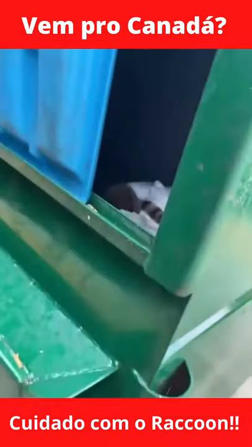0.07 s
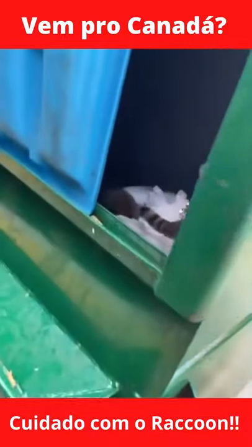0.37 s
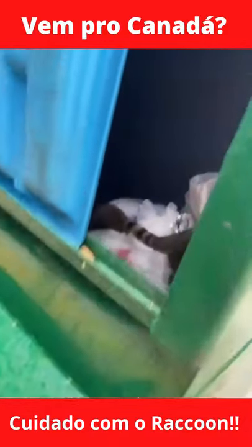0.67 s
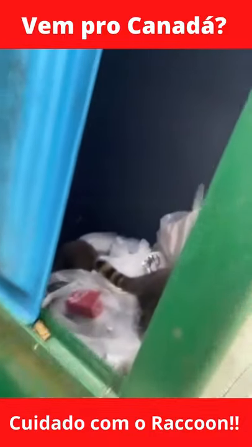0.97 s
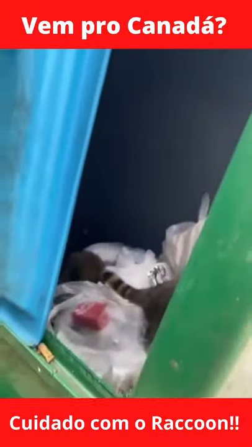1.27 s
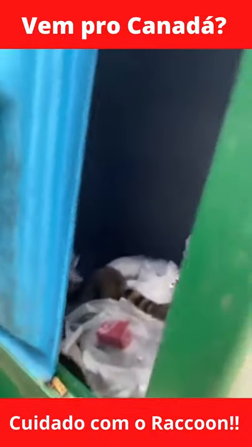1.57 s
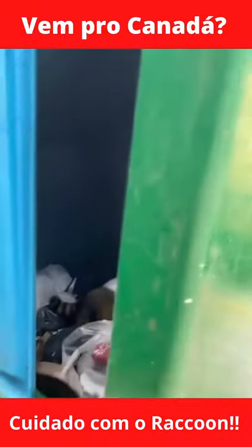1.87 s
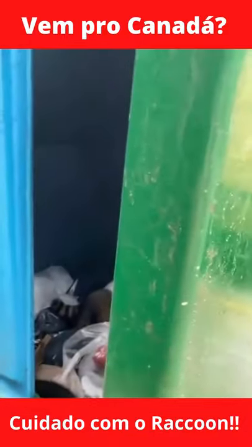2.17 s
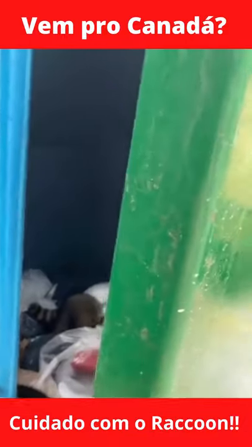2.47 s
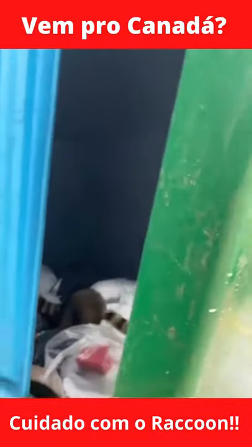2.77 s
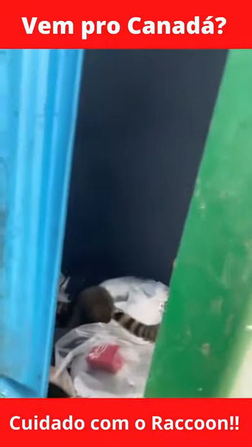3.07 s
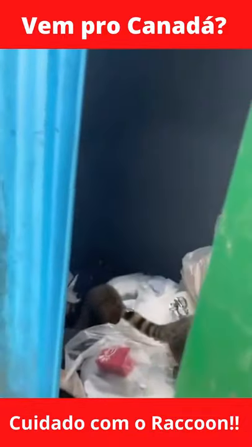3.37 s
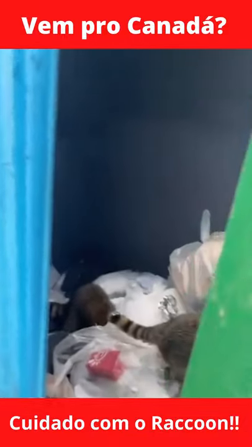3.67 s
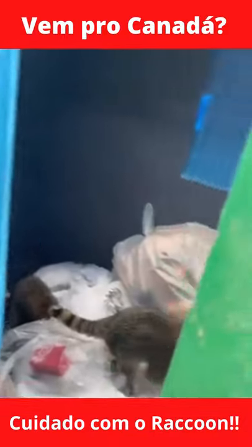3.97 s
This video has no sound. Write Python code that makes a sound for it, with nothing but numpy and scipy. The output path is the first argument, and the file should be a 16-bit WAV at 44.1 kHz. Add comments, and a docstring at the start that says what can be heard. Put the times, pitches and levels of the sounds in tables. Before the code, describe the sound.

Plastic bags rustle faintly and irregularly as an animal rummages in an outdoor bin, with light ticks and dull scrapes until about 1.7 seconds. Stiffer plastic snaps sharply at 2.1 seconds, followed by a few weaker snaps. The rustling picks up again from 3 seconds. Low wind buffets the microphone throughout, strongest around 1 second, over steady distant traffic.

```python
"""At a big outdoor rubbish bin, an animal rummages among plastic bags. Thin film swishes by friction and
crinkles by buckling, rubbish scrapes deeper down, and stiffer plastic snaps a few times; the snaps
and the larger creases reverberate briefly between the bin's walls. Turbulent gusts buffet the
microphone over the steady broadband wash of distant traffic."""
import sys
import numpy as np
from scipy import signal
from scipy.fft import rfft, irfft, next_fast_len
from scipy.io import wavfile
from scipy.ndimage import uniform_filter1d, map_coordinates

SR = 44100
rng = np.random.default_rng(int(sys.argv[2]) if len(sys.argv) > 2 else 0)


def file_out(sig):
    """Save sig as 16-bit WAV at sys.argv[1]."""
    # one column per channel
    cols = np.atleast_2d(sig).T
    # limit, then scale
    lim = np.clip(cols, -1, 1)
    pcm = np.round(lim * 32767).astype(np.int16)
    wavfile.write(sys.argv[1], SR, pcm)


N = 176400
TIME = np.arange(N) / SR


def amp(db):
    """Decibels to amplitude ratio."""
    return 10 ** (np.asarray(db) / 20)


def unit(x):
    """Normalisation to an rms of 1."""
    return x / np.sqrt(np.mean(x ** 2) + 1e-20)


def along(points, hz):
    """Interpolation of (Hz, value) points on a logarithmic frequency axis."""
    freqs, values = np.transpose(points)
    return np.interp(np.log(hz + 1), np.log(freqs + 1), values)


def wobble(knots_per_s):
    """Smooth random modulation: a spline through Gaussian knots."""
    return map_coordinates(rng.standard_normal(400), [TIME * knots_per_s], mode="wrap")


def coloured(x, gain_db):
    """Minimum-phase filtering of x by a gain in dB given as a function of frequency."""
    size = 2 * next_fast_len(len(x) // 2 + SR // 10)
    gain = amp(gain_db(np.fft.rfftfreq(size, 1 / SR)))
    cepstrum = irfft(np.log(gain + 1e-6), size)
    cepstrum[1:size // 2] *= 2  # folding the cepstrum makes the filter causal
    cepstrum[size // 2 + 1:] = 0
    return irfft(rfft(x, size) * np.exp(rfft(cepstrum)), size)[:len(x)]


def noise(spectrum):
    """White noise filtered to a spectrum, at an rms of 1."""
    return unit(coloured(rng.standard_normal(N), lambda hz: along(spectrum, hz)))


def evened(x, samples):
    """Division by the running rms removes chance swells."""
    power = uniform_filter1d(uniform_filter1d(x ** 2, samples), samples)
    return x / np.sqrt(np.abs(power) + 1e-9)


def bump(t, rise_s):
    """A critically damped pulse: it starts at t = 0, peaks at rise_s and dies away."""
    u = np.maximum(t, 0) / rise_s
    return u * np.exp(1 - u)


def swells(strokes):
    """The envelope of strokes that rise and fall exponentially and add in power."""
    return np.sqrt(sum((amp(db) * np.exp(-np.maximum((peak - TIME) / rise, (TIME - peak) / fall))) ** 2
                       for peak, db, rise, fall in strokes))


def resonance(hz, centre_hz, width_hz):
    """A Lorentzian resonance curve of height 1."""
    return 1 / (1 + (2 * (hz - centre_hz) / width_hz) ** 2)


# Each row: frequency in Hz, relative spectral level in dB.
TRAFFIC_SPECTRUM = [(30, -5), (100, 5), (250, 6), (450, -1.5), (750, 2), (1100, -4.5), (1600, -11.5),
                    (2500, -17), (4000, -20), (7000, -26), (11700, -32), (12600, -39), (16000, -49)]
def traffic(level_db=-43):
    """Many distant vehicles add incoherently into a nearly steady wash."""
    return noise(TRAFFIC_SPECTRUM) * amp(level_db + 0.68 * wobble(3.48))


# Each row: time in seconds, wind level in dB.
GUSTS = [(0.0, -10), (0.03, -56), (0.08, -21), (0.11, -29), (0.29, -38.5), (0.36, -28), (0.51, -32.5),
         (0.68, -13.5), (0.73, -26.5), (0.79, -20.5), (0.85, -27.5), (0.87, -14.5), (0.97, -8),
         (1.0, -13.5), (1.05, -11), (1.08, -12.5), (1.17, -12), (1.2, -17.5), (1.3, -25), (1.38, -30.5),
         (1.43, -24), (1.47, -28.5), (1.5, -24), (1.54, -40), (1.57, -25.5), (1.76, -22), (1.84, -18),
         (1.94, -22.5), (1.98, -18.5), (2.03, -28), (2.09, -21), (2.13, -29.5), (2.19, -15), (2.34, -27.5),
         (2.36, -18.5), (2.41, -34), (2.43, -19.5), (2.64, -29), (2.66, -23), (2.85, -26), (2.87, -26),
         (3.07, -13.5), (3.2, -32), (3.26, -15), (3.3, -28.5), (3.34, -21), (3.73, -30.5), (3.79, -12.5),
         (3.95, -14), (4.0, -19.5)]
# The wind's deep and higher layers. Each row: frequency in Hz, relative spectral level in dB.
BUFFET_SPECTRUM = [(15, -49.5), (28, -25), (45, 1.5), (70, 1), (120, -6), (180, -15), (300, -40),
                   (600, -49.5), (1500, -100)]
FLUTTER_SPECTRUM = [(60, -45), (130, 7), (200, 4), (330, -4), (480, -17.5), (750, -26), (1500, -49),
                    (4000, -92)]
def wind(buffet_db=-1, churn_db=-31.5, churn_growth=1.87, strong_wind_db=-13.5):
    """Turbulent pressure at the microphone: deep buffeting follows the gusts, churning grows faster."""
    gust_db = np.interp(TIME, *np.transpose(GUSTS))
    buffet = evened(noise(BUFFET_SPECTRUM), samples=2200) * amp(gust_db + buffet_db + 1.8 * wobble(28))
    churn = evened(noise(FLUTTER_SPECTRUM), samples=1500)
    churn *= amp(churn_db + churn_growth * (gust_db - strong_wind_db) + 3.7 * wobble(45))
    return buffet + churn


# The pressure kink at an eddy's front. Each row: frequency in Hz, relative spectral level in dB.
KNOCK_SPECTRUM = [(40, -25.5), (110, -8.5), (190, 6), (320, -9), (480, -22.5), (750, -35.5), (1500, -59),
                  (4000, -99)]
# Each row: start in seconds, relative level of the knock in dB, relative level of the swing in dB.
EDDY_IMPACTS = [(0.046, -37, -21.5), (0.348, -37, -20), (0.584, -21.5, -22.5), (0.614, -23.5, -34),
                (0.644, -23.5, -29), (0.67, -22, -14.5), (0.767, -29, -23), (0.864, -21.5, -24),
                (0.908, -11.5, -8), (0.973, -3.5, -16), (1.028, -8, -11), (1.072, -11, -16),
                (1.12, -13.5, -15), (1.166, -31, -13), (1.209, -15, -33), (1.241, -21.5, -14),
                (1.29, -21.5, -11.5), (1.318, -24, -17), (1.557, -34, -19), (1.592, -19, -15),
                (1.659, -20, -41), (1.78, -18.5, -15), (1.827, -10, -10.5), (1.893, -39, -26),
                (1.975, -30, -11), (2.079, -45, -19.5), (2.143, -18.5, -26), (2.154, -22.5, -18),
                (2.19, -22.5, -19), (2.448, -22.5, -14), (2.663, -28, -22), (2.71, -29.5, -16.5),
                (2.771, -18.5, -14), (2.82, -26.5, -14.5), (2.937, -21, -16.5), (3.008, -18, -15.5),
                (3.063, -12, -6.5), (3.109, -24, -16), (3.24, -14, -13), (3.257, -23, -24),
                (3.334, -23, -41), (3.773, -20, -7.5), (3.822, -24, -18), (3.893, -17, -14),
                (3.97, -28, -7)]
def eddies(swing_hz=74, knock_lag_s=0.00259, hard_knock_db=-11.5):
    """Each eddy knocks the diaphragm and sets off a damped oscillation under a brief flutter."""
    out = np.zeros(N)
    flutter = evened(noise(FLUTTER_SPECTRUM), samples=600)
    front = signal.unit_impulse(SR // 6, int(knock_lag_s * SR))
    draws = rng.standard_normal((len(EDDY_IMPACTS), 2))
    for (start, knock_db, swing_db), (detune, phase) in zip(EDDY_IMPACTS, draws):
        span = slice(int(start * SR), int(start * SR) + len(front))
        t = TIME[span] - start
        tilt_db = 0.6 * (knock_db - hard_knock_db)  # per octave: harder knocks are brighter
        knock = coloured(front, lambda hz: along(KNOCK_SPECTRUM, hz) + tilt_db * np.log2(1 + hz / swing_hz))
        knock *= np.sign(phase) / np.abs(knock).max()
        swing = np.sin(2 * np.pi * (swing_hz * np.exp(0.15 * detune) * t + phase))
        out[span] += amp(swing_db + 2) * bump(t, rise_s=0.0064) * swing
        out[span] += amp(knock_db - 2.5) * knock[:len(t)]
        out[span] += amp(knock_db - 8) * bump(t, rise_s=0.0032) * flutter[span]
    return out


# Thin plastic film. Each row: frequency in Hz, relative spectral level in dB.
FILM_SPECTRUM = [(500, -7), (1200, -0.5), (2400, 1), (3500, 1), (5000, 3), (6500, -2), (9000, -2),
                 (11500, -4), (13500, -15), (16000, -22)]
# Each row: time of the peak in seconds, level in dB, rise and fall time constants in seconds.
BAG_PUSHES = [(.172, -50, 0.021, 0.05), (.358, -52, 0.078, 0.05), (.525, -57.5, 0.034, .03),
              (.6, -51.5, 0.034, 0.078), (.785, -44, 0.046, 0.044), (.9, -51, 0.085, 0.076),
              (.962, -43, 0.046, 0.055), (1.13, -53, 0.17, 0.08), (1.3, -54.5, 0.069, 0.061),
              (1.55, -60, 0.26, 0.056), (2.8, -61.5, 0.36, 0.13), (2.98, -55.5, 0.11, 0.1),
              (3.072, -49, 0.0072, 0.034), (3.172, -54, 0.018, 0.029), (3.34, -51.5, 0.081, 0.12),
              (3.41, -51.5, 0.035, 0.038), (3.51, -45.5, 0.027, 0.035), (3.655, -44.5, 0.041, 0.042),
              (3.74, -55, .04, .05), (3.86, -48, 0.063, 0.061)]
def bags(crinkles_per_s=1300, spread_db=4.5, slide_share=0.42):
    """Friction and buckling: pushed film hisses as it slides and gives way in countless tiny impulses."""
    sizes = amp(spread_db * np.minimum(rng.standard_normal(N), 2))
    buckles = rng.random(N) < crinkles_per_s / SR
    crinkles = unit(buckles * rng.choice([-1, 1], N) * sizes)
    friction = rng.standard_normal(N)
    grain = np.sqrt(1 - slide_share) * crinkles + np.sqrt(slide_share) * friction
    rustle = unit(coloured(grain, lambda hz: along(FILM_SPECTRUM, hz)))
    return rustle * swells(BAG_PUSHES) * amp(1.1 * wobble(90))


# Each row: frequency in Hz, time to decay by 60 dB in seconds.
BIN_DECAY = [(500, 0.6), (3500, 0.15), (7000, .15), (14000, 0.15)]
def bin_echo(x, wall_delay_s=0.004):
    """Reverberation: reflections between the walls merge into a short tail, longest in the bass."""
    hz, t, spectra = signal.stft(rng.standard_normal(SR // 3), SR, nperseg=128)
    decay = amp(-60 * t / along(BIN_DECAY, hz)[:, None])
    _, tail = signal.istft(spectra * decay, SR, nperseg=128)
    tail = np.pad(tail / np.linalg.norm(tail), (int(wall_delay_s * SR), 0))
    return signal.fftconvolve(x, tail)[:len(x)]


def crack(peak_s, half_length_s, body_db, tilt_db, echo_db):
    """Snap-through buckling: a crease gives way in a burst of milliseconds, and the bin reverberates."""
    lead = SR // 50
    t = (np.arange(SR // 3) - lead) / SR
    envelope = 1 / np.cosh(np.clip(t / half_length_s, -20, 20))
    echo = amp(echo_db) * np.linalg.norm(envelope) * bin_echo(signal.unit_impulse(len(t), lead))
    burst = envelope * rng.standard_normal(len(t)) + echo
    shaped = coloured(burst, lambda hz: body_db(hz) + tilt_db * np.log2(np.maximum(hz, 700) / 4000))
    return np.pad(unit(shaped) * np.std(burst), (int(peak_s * SR) - lead, N))[:N]


# Each row: time in seconds, level in dB, spectral tilt in dB per octave.
FILM_CREASES = [(.361, -51.5, 5), (0.4207, -45.5, -1.5), (0.589, -48.5, -2.5), (0.613, -46.5, 6),
                (0.955, -45, 1), (1.698, -41, -10), (3.065, -53, 3), (3.549, -49.5, -1), (3.9, -52, 0)]
def flicks(half_length_s=0.0027):
    """Larger creases in the film buckle singly and stand out of the rustle as light ticks."""
    film_db = lambda hz: along(FILM_SPECTRUM, hz)
    return sum(amp(db) * crack(peak_s, half_length_s, film_db, tilt_db, echo_db=2.5)
               for peak_s, db, tilt_db in FILM_CREASES)


# Each row: frequency in Hz, relative spectral level in dB.
RASP_SPECTRUM = [(700, 1.5), (1300, -8), (2200, -8), (3300, -11), (5000, -18), (9000, -38)]
# Each row: peak time in seconds, level in dB, rise and fall time constants in seconds, resonance in Hz.
RUBBISH_SHIFTS = [(0.4197, -37.5, 0.0013, 0.0083, 2470), (.74, -52, 0.053, .03, 2200),
                  (1.43, -52, 0.024, .025, 2320), (1.505, -50, 0.059, 0.13, 2200),
                  (1.7, -50, 0.0089, 0.021, 1780)]
def scrapes(width_hz=300, lift_db=11):
    """Friction excites a resonance: rubbish shifts under the bags with a duller rasp."""
    out = np.zeros(N)
    for *stroke, centre_hz in RUBBISH_SHIFTS:
        rasp_db = lambda hz: along(RASP_SPECTRUM, hz) + lift_db * resonance(hz, centre_hz, width_hz)
        rasp = unit(coloured(rng.standard_normal(N), rasp_db))
        out += rasp * swells([stroke])
    return out * amp(1.6 * wobble(85))


# Each row: frequency in Hz, relative spectral level in dB.
SNAP_SPECTRUM = [(400, -11), (900, -17), (1900, -16), (2800, -4.5), (3600, -1), (5400, -3.5), (6500, -13),
                 (10200, -11.5), (12000, -26), (16000, -28)]
# Each row: resonant frequency in Hz, width in Hz, lift in dB.
SNAP_MODES = [(3350, 300, 3), (5000, 900, 4), (12580, 130, 14), (13950, 80, 14)]
# Each row: time in seconds, level in dB, spectral tilt in dB per octave, half length in seconds.
PLASTIC_SNAPS = [(2.092, -26, -1.5, 0.0018), (2.154, -38.5, -5.5, 0.0024), (2.23, -45, 0.5, 0.0027),
                 (2.486, -50, 0, 0.0056), (2.851, -53, 0, .004)]
def snaps():
    """Impulsive excitation: stiff plastic snaps and rings briefly in its modes."""
    def body_db(hz):
        modes_db = sum(lift * resonance(hz, centre, width) for centre, width, lift in SNAP_MODES)
        return along(SNAP_SPECTRUM, hz) + modes_db
    return sum(amp(db) * crack(peak_s, half_length_s, body_db, tilt_db, echo_db=-2.5)
               for peak_s, db, tilt_db, half_length_s in PLASTIC_SNAPS)


def scene():
    """Superposition: the street, the wind and the bin's sounds add at one microphone."""
    return (traffic() + wind() + eddies() + bags() + flicks() + scrapes() + snaps())[None]


def record(dry, low_cut_hz=34.3, top_hz=15700):
    """Band limiting: the phone thins the deepest bass and cuts off the highest treble."""
    high_pass = signal.butter(2, low_cut_hz, "high", fs=SR, output="sos")
    low_pass = signal.ellip(10, 0.1, 80, top_hz, fs=SR, output="sos")
    return signal.sosfilt(low_pass, signal.sosfilt(high_pass, dry))


dry = scene()
out = record(dry)
file_out(out)
```